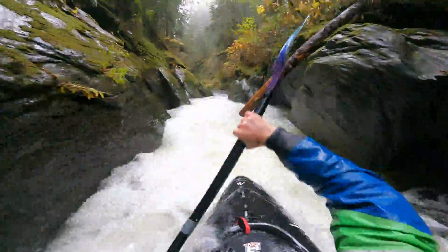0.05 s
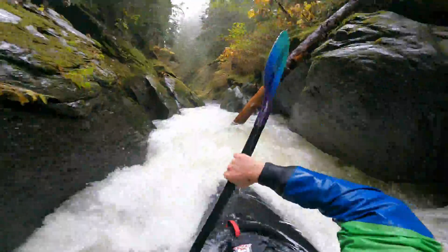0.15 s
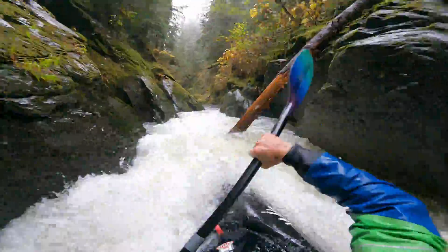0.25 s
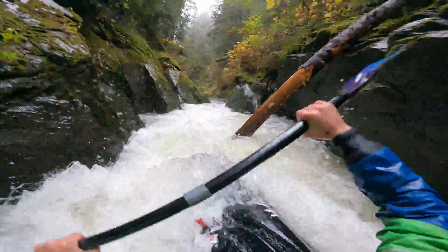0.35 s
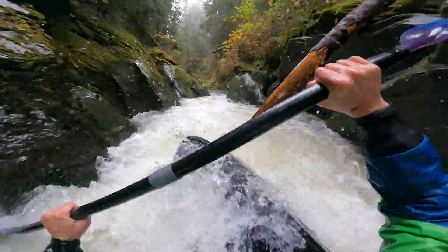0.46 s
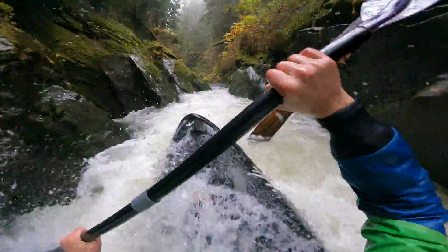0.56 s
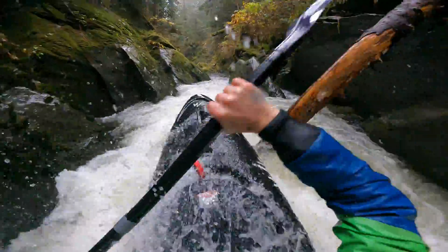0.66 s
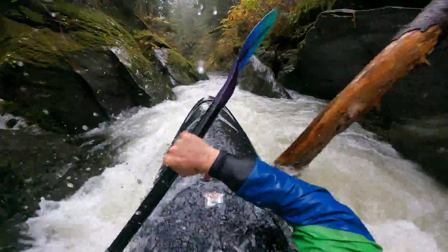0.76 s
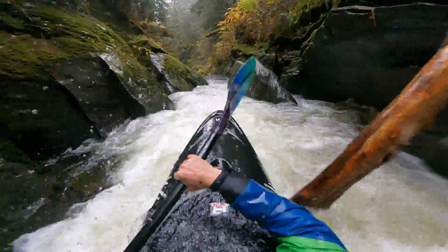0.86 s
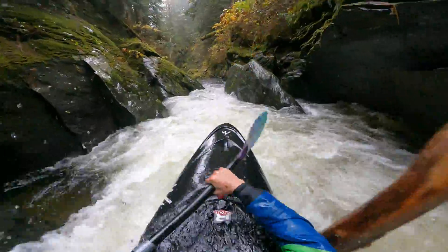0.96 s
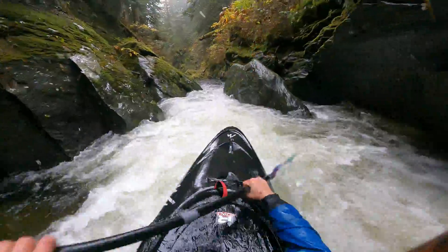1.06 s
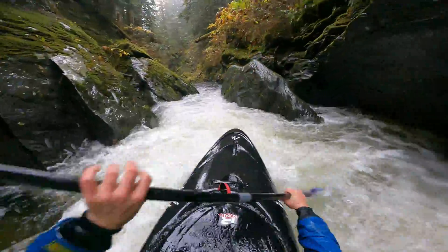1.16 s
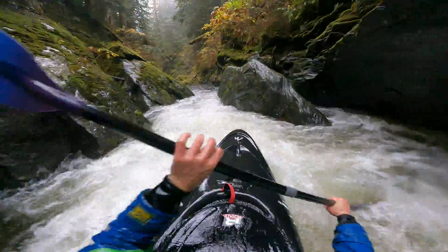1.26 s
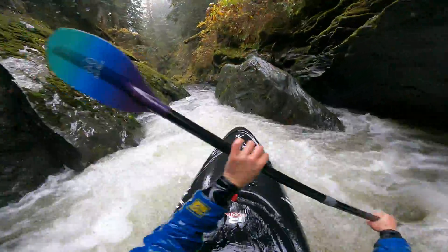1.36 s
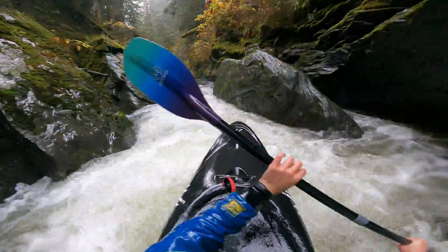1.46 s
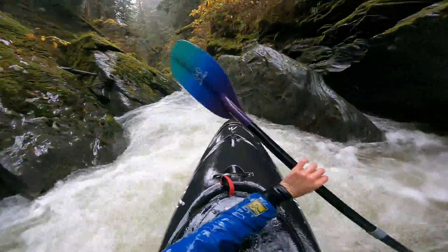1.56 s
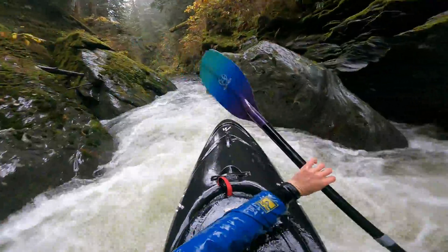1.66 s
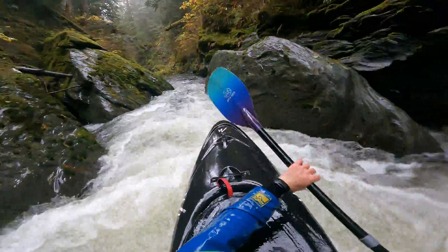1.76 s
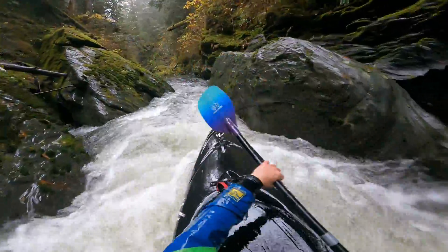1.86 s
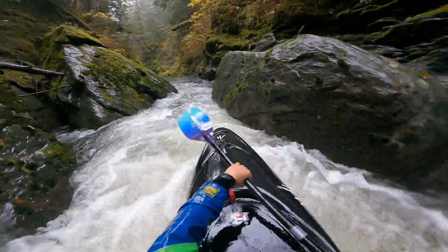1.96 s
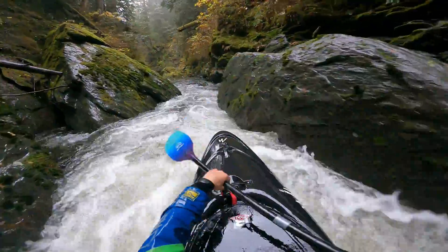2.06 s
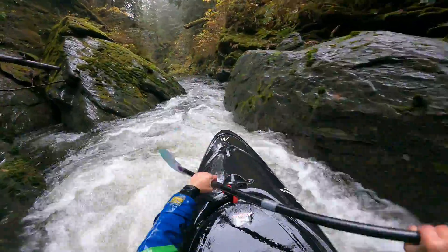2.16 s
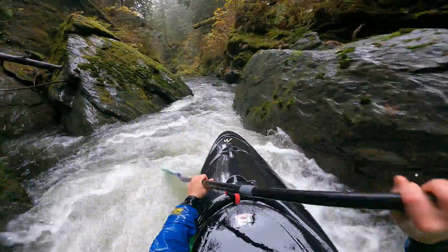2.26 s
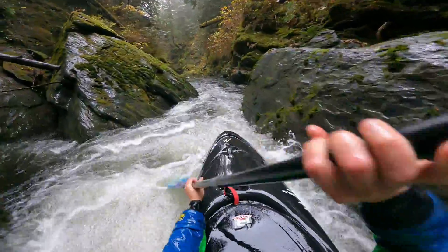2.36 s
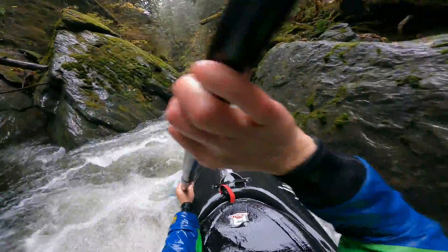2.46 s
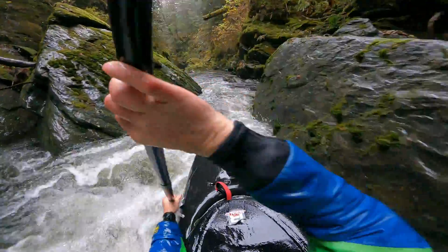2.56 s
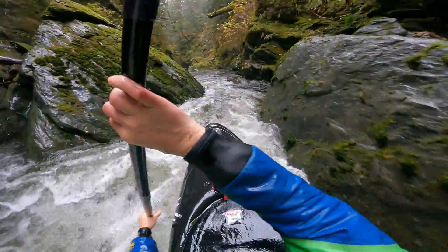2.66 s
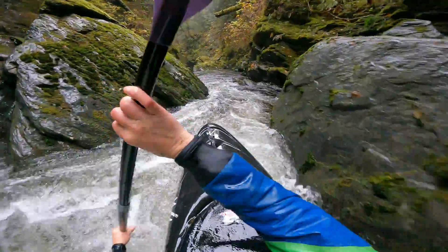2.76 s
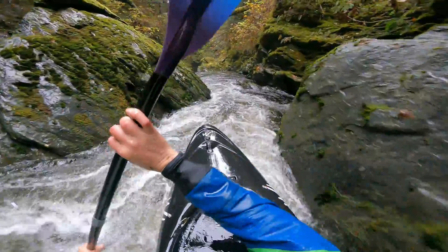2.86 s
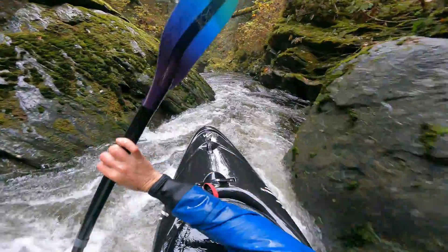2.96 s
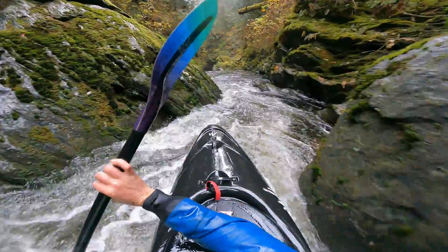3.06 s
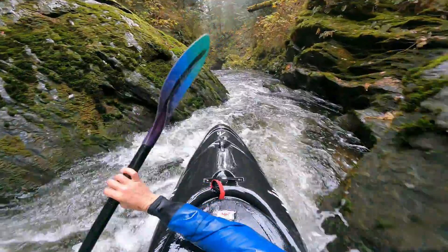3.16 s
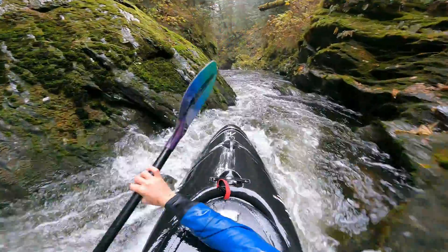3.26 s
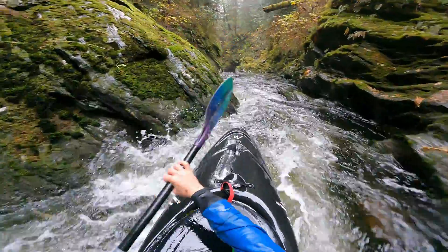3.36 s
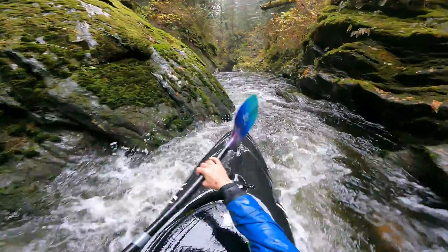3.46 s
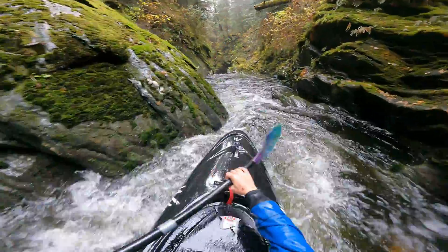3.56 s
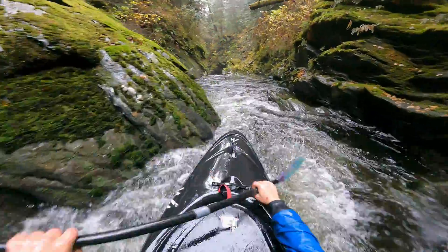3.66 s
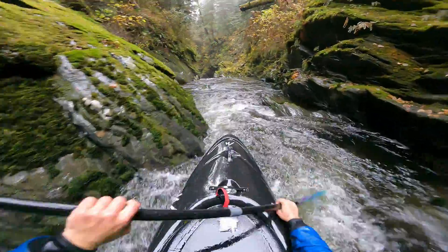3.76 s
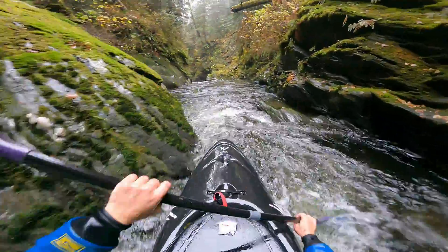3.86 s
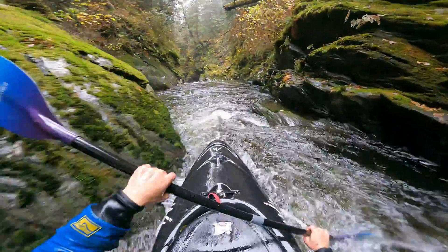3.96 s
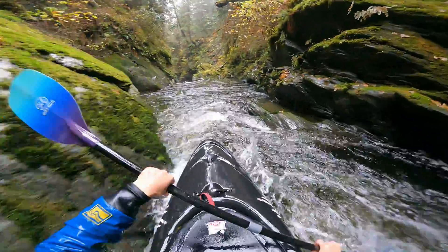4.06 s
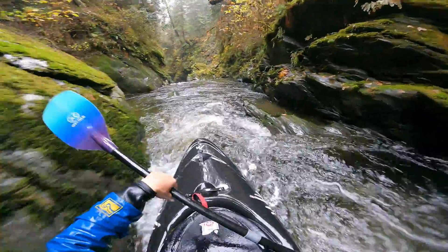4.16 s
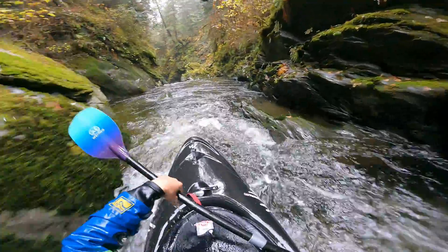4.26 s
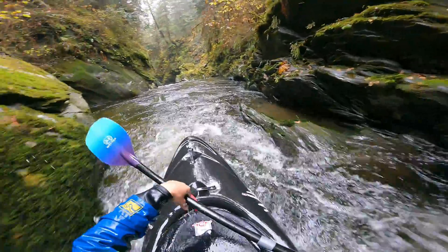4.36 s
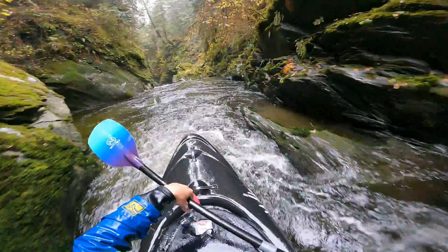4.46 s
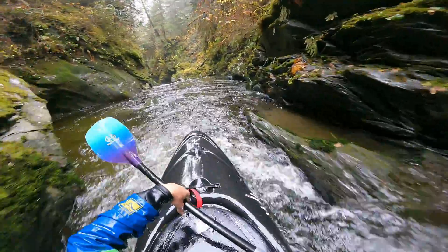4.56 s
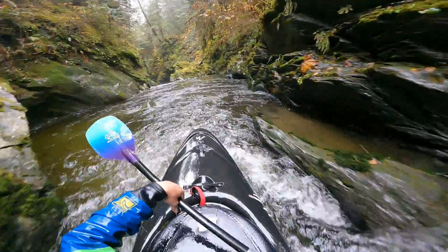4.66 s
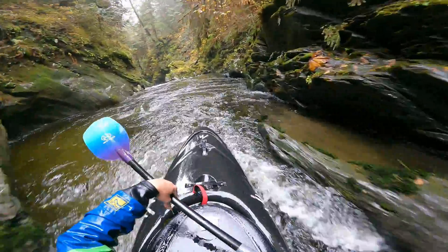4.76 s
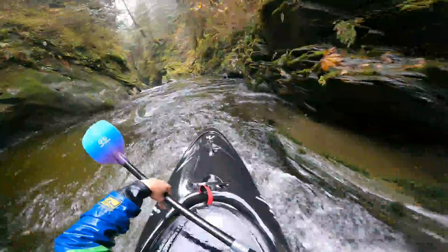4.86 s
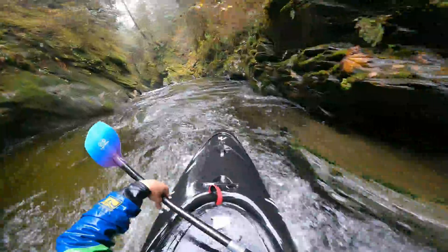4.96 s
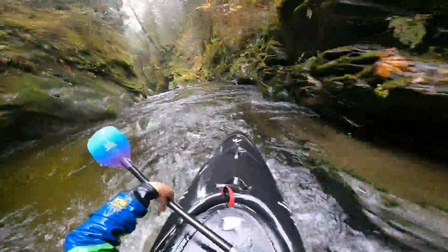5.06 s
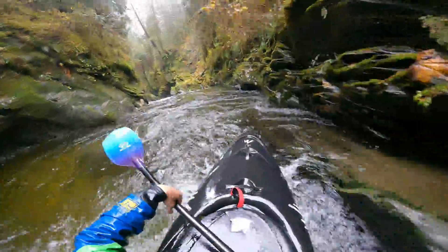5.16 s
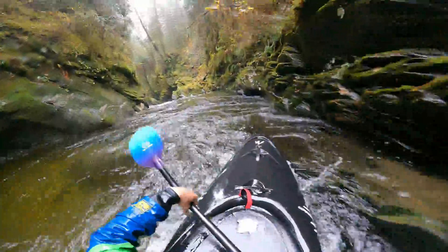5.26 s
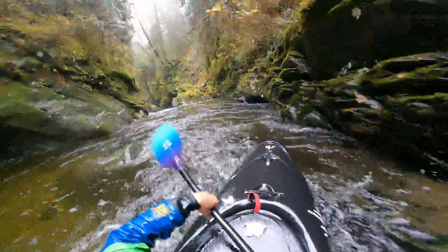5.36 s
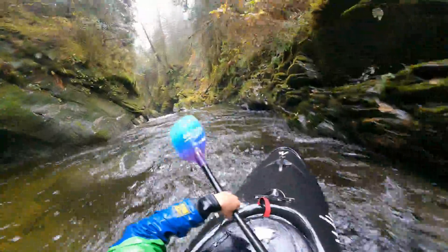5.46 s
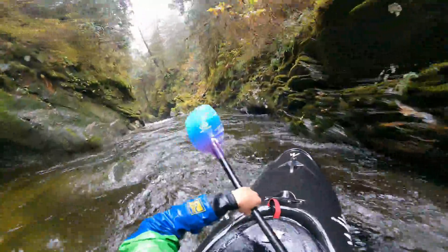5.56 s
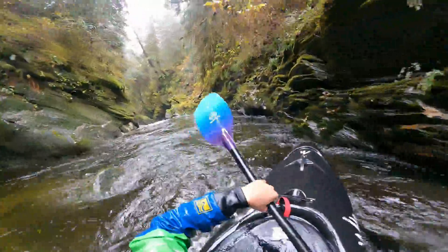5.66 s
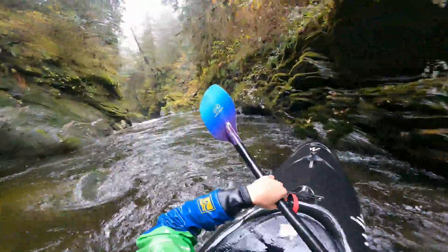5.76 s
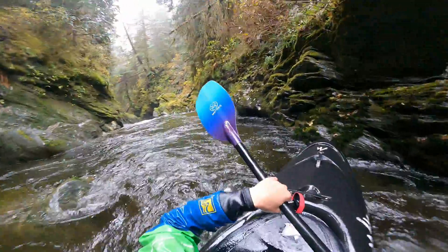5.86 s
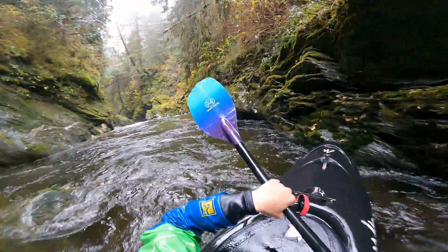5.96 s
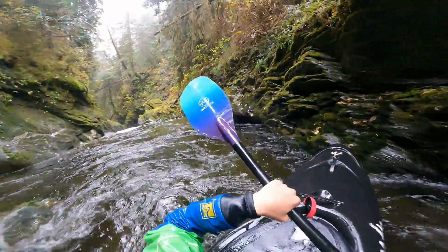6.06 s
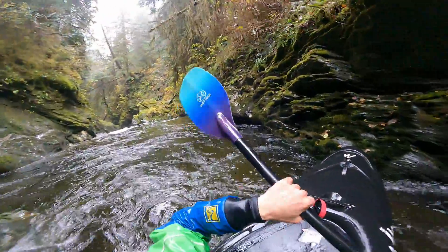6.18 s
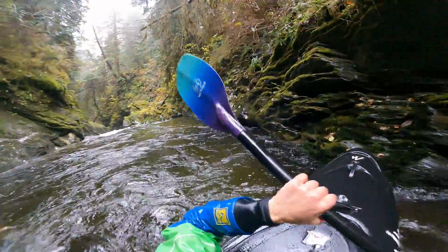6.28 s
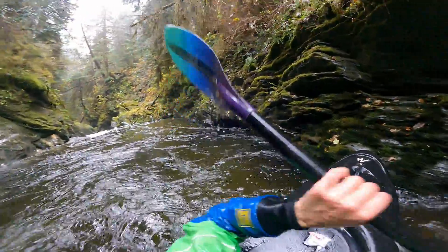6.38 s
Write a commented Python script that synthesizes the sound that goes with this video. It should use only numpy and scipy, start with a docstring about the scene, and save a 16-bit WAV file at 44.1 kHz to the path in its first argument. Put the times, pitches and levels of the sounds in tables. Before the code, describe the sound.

A kayak runs a rapid with a dull, waterlogged roar and hull slaps, giving way to thin watery hiss and plinking drops.

```python
"""A muffled roar with thumps and slaps on a hull: a kayak runs a steep creek rapid, heard by a small
helmet microphone whose port is drowned. Bursting bubbles make the roar; waves jolt and strike the boat.
As it glides into calmer water the port drains, drops ring, and the water hisses through the port's
resonances, which rise in pitch whenever the film of water thins."""
import sys
import numpy as np
from scipy import signal
from scipy.fft import rfft, irfft, next_fast_len
from scipy.io import wavfile
from scipy.ndimage import map_coordinates

SR = 44100
rng = np.random.default_rng(int(sys.argv[2]) if len(sys.argv) > 2 else 0)


def generate_wav(signal):
    """Clip the signal to [-1, 1] and save it as 16-bit WAV at the path in sys.argv[1]."""
    frames = np.transpose(np.atleast_2d(signal))
    scaled = np.clip(frames, -1, 1) * 32767
    pcm = np.round(scaled).astype(np.int16)
    wavfile.write(sys.argv[1], SR, pcm)


N = 283122


def amp(db):
    """Decibels to gain."""
    return 10 ** (np.asarray(db) / 20)


def rms_one(x):
    """Scale to unit rms."""
    return x / np.sqrt(np.mean(x ** 2) + 1e-20)


def curves(rows):
    """One automation curve for each column after the time, one value a sample."""
    times, *columns = np.transpose(rows)
    return [np.interp(np.arange(N) / SR, times, column) for column in columns]


def swells(rows):
    """Summed bell-shaped swells from rows of t/s, height, half-width/s."""
    t = np.arange(N) / SR
    return sum(height * np.exp(-((t - at) / width) ** 2) for at, height, width in rows)


def with_swells(bed, peaks):
    """Gain of a level curve with swells on top, both given in dB."""
    return amp(curves(bed)[0]) + swells([(at, amp(db), width) for at, db, width in peaks])


def drift(rate_hz, size=N):
    """Slow random wander of unit rms: coarse noise through a double one-pole low-pass."""
    step, settle = 20, 2000
    pole = np.exp(-2 * np.pi * rate_hz * step / SR)
    coarse = rng.standard_normal(size // step + settle + 2)
    slow = signal.lfilter([1], [1, -2 * pole, pole * pole], coarse)[settle:]
    return np.interp(np.arange(size) / step, np.arange(len(slow)), rms_one(slow))


def eq_curve(points):
    """Frequency response through points of f/Hz, level/dB."""
    hz, db = np.transpose(points)
    return lambda f: amp(np.interp(np.log(f), np.log(hz), db))


def froth(response, lumpy_db, rate_hz, size=N):
    """Bursting bubbles merge into lumpy noise, coloured by a frequency response."""
    padded = next_fast_len(size)
    bursts = rng.standard_normal(size) * amp(lumpy_db * drift(rate_hz, size))
    hz = np.maximum(np.arange(padded // 2 + 1) * SR / padded, 1)
    return rms_one(irfft(rfft(bursts, padded) * response(hz), padded)[:size])


def bent_froth(response, rise, lumpy_db, rate_hz):
    """Froth read at varying speed, so its resonances scale by the factor rise."""
    source = froth(response, lumpy_db, rate_hz, size=N * 4 // 3)
    return map_coordinates(source, np.cumsum(rise)[None], order=3)


def hits(rows, spread, attack_s, cycles, loose):
    """Clusters of rings around a pitch, falling 60 dB in so many cycles; loose (0-1) scatters phase."""
    count = 16
    out = np.zeros(N + SR)
    t = np.arange(SR // 4) / SR
    for (at, db, hz), (detune, phase) in zip(rows, rng.uniform(-1, 1, (len(rows), 2, count, 1))):
        ratio = np.exp(spread * detune)
        rings = np.sin(2 * np.pi * hz * ratio * t + np.pi * loose * phase) / ratio ** 2
        cluster = rings.sum(0) / count ** (1 - loose / 2)
        attack = 1 - np.exp(-(t / attack_s) ** 2)
        decay = amp(db - 60 * t * hz / cycles)
        out[round(at * SR):][:len(t)] += decay * cluster * attack
    return out[:N]


RUMBLE_EQ = [(7.1, -21), (12, 15.5), (34, 12), (75, 2), (98, -20), (160, -120)]  # sub-bass of the waves: f/Hz, level/dB
RUMBLE_BED = [(0, -22.5), (.15, -24), (.42, -23.5), (.68, -31.5), (1.0, -27), (2.0, -35), (2.4, -36.5),
              (2.62, -32), (3.0, -30.5), (3.2, -33), (4.2, -36.5), (6.42, -33.5)]  # its steady bed: t/s, level/dB
BOAT_JOLTS = [(0.276, -28.5, 0.11), (0.551, -23, 0.086), (0.902, -16.5, 0.056), (1.19, -17.5, 0.06),
              (1.382, -34.5, 0.071), (1.95, -29.5, 0.038), (2.753, -31.5, 0.15), (5.197, -34.5, 0.088),
              (6.123, -26.5, 0.068)]  # swells on top: t/s, level/dB, half-width/s


def wave_rumble():
    """Waves rumble under the boat and swell as they jolt it."""
    gain = with_swells(RUMBLE_BED, BOAT_JOLTS)
    return gain * froth(eq_curve(RUMBLE_EQ), lumpy_db=-5.0, rate_hz=5.0)


FLOW_LEVELS = [(0, -20.5, -22.5), (.75, -20.5, -23), (1.3, -24.5, -25.5), (1.9, -25, -24), (2.4, -27, -28),
               (2.6, -27.5, -29.5), (2.9, -26, -25.5), (3.5, -26, -26), (4.1, -26, -31),
               (4.6, -28.5, -29.5), (4.97, -26.5, -31), (5.03, -27.5, -25.5), (5.2, -26.5, -30),
               (5.31, -24, -29), (5.42, -29.5, -30.5), (5.7, -25.5, -29.5), (6.42, -28.5, -27.5)]  # water around the boat: t/s, roar level/dB, boom level/dB
BOOM_EQ = [(41, -10.5), (70, 0.5), (119, -5), (157, -0.5), (230, -5.5), (300, -22.5), (510, -120)]  # low body of the hull: f/Hz, level/dB
ROAR_EQ = [(130, -34), (220, -0.5), (356, -1), (405, -1.5), (722, -3.5), (793, -3.5), (826, -17.5),
           (880, -11), (1140, -43), (1940, -120)]  # low mids of the rapid: f/Hz, level/dB
LEAK_EQ = [(470, -51.5), (800, 3), (1020, -2), (1780, -22.5), (2690, -33.5), (4410, -46), (5200, -52.5),
           (6500, -56.5), (7600, -72), (9700, -120)]  # dull wash above the roar: f/Hz, level/dB
LEAK_FADE = [(0, -29.5), (.5, -28), (.68, -27.5), (.9, -30.5), (1.19, -31.5), (1.25, -32), (2.55, -35.5),
             (2.63, -34.5), (2.76, -35), (3.7, -40.5), (4.2, -72)]  # fade of that wash: t/s, level/dB


def whitewater():
    """The hull booms, the rapid roars and a dull wash leaks through the drowned port."""
    roar_db, boom_db = curves(FLOW_LEVELS)
    boom = amp(boom_db) * froth(eq_curve(BOOM_EQ), lumpy_db=1.36, rate_hz=3.6)
    roar = amp(roar_db) * froth(eq_curve(ROAR_EQ), lumpy_db=1.0, rate_hz=47.0)
    leak = amp(curves(LEAK_FADE)[0]) * froth(eq_curve(LEAK_EQ), lumpy_db=1.2, rate_hz=18.0)
    return boom + roar + leak


SPRAY_EQ = [(3500, -35), (5000, 8), (6500, 10.5), (8500, 11.5), (10500, -3), (12500, -12.5), (13800, -38.5),
            (14500, -32)]  # sizzle of droplets: f/Hz, level/dB
MIST_BED = [(5.3, -110), (5.6, -75), (5.97, -74), (6.15, -56), (6.42, -63)]  # steady spray through the thinning film: t/s, level/dB
SPRAY_BURSTS = [(0.06, -65, 0.026), (0.226, -73, 0.071), (0.422, -78, 0.073), (5.694, -70, 0.021),
                (6.109, -50, 0.019), (6.254, -53, 0.025), (6.335, -67, 0.023)]  # short spits: t/s, level/dB, half-width/s


def spray():
    """Faint bright spray: a few spits at the start, then a sizzle with short spits near the end."""
    gain = with_swells(MIST_BED, SPRAY_BURSTS)
    return gain * froth(eq_curve(SPRAY_EQ), lumpy_db=2.0, rate_hz=48.0)


SPLASH_CUES = [(.553, -36, 2000), (.592, -32.5, 2090), (.641, -32, 2020), (.652, -37, 2500),
               (.731, -35.5, 2890), (1.184, -28, 1246), (1.187, -40, 2500), (2.591, -31, 1570),
               (2.597, -46, 3220), (2.599, -29, 1690), (2.605, -36, 1580), (2.606, -44, 3300),
               (3.5, -41, 3000), (4.05, -31, 3735), (5.844, -23, 3655), (6.244, -21, 3550)]  # water on the helmet: t/s, level/dB, f/Hz


def helmet_splashes():
    """Water hits the helmet in short, noisy splats."""
    return hits(SPLASH_CUES, spread=0.24, attack_s=0.00056, cycles=56, loose=0.99)


DROP_CUES = [(.731, -46, 4800), (2.512, -43, 3800), (3.688, -33, 3460), (3.93, -29, 3070),
             (4.06, -34, 4080), (4.45, -29, 3400), (4.63, -30, 3096), (4.929, -11.5, 1550),
             (6.244, -14.5, 2350), (6.366, -15, 1920), (6.375, -14.5, 1374)]  # plinks: t/s, level/dB, f/Hz


def drops():
    """Single drops ring briefly at one pitch."""
    return hits(DROP_CUES, spread=0.036, attack_s=0.0008, cycles=64, loose=0.1)


THUMP_CUES = [(1.182, -7.5, 88), (1.61, -17, 36), (1.75, -11.5, 138), (1.8, -15.5, 70), (1.875, -13.5, 112),
              (2.605, -14, 50.6), (2.70, -15, 41), (2.79, -15, 77.4), (2.745, -18, 45.6), (2.925, -9.5, 85),
              (2.93, -19, 31.1), (2.975, -19, 74.6), (6.09, -19.5, 26)]  # bass hits on the hull: t/s, level/dB, f/Hz


def hull_thumps():
    """Heavy waves thump the hull with a soft attack."""
    return hits(THUMP_CUES, spread=0.046, attack_s=0.015, cycles=18, loose=0.2)


SLAP_CUES = [(1.084, -8.5, 620), (1.183, -5.5, 750), (1.188, -6.5, 520), (2.593, -13.5, 596),
             (3.025, -23, 568), (3.141, -15, 560), (3.227, -16, 610), (3.272, -11.5, 596),
             (3.308, -22, 603), (3.338, -13.5, 520), (3.517, -10, 258), (4.268, -8.5, 366.7),
             (5.012, -12.5, 669), (5.29, -14, 600)]  # midrange knocks on the hull: t/s, level/dB, f/Hz


def hull_slaps():
    """Water slaps the hull, quick and dull."""
    return hits(SLAP_CUES, spread=0.12, attack_s=0.001, cycles=28, loose=0.1)


def behind_film(modes, steepness):
    """Response of parallel resonances, with the top damped by the water film."""
    film_hz = 6680  # low-pass corner at rest

    def response(f):
        power = sum(amp(2 * db) / (1 + ((f - hz ** 2 / f) / width) ** 2) ** steepness
                    for hz, width, db in modes)
        return np.sqrt(power / (1 + (f / film_hz) ** 22))
    return response


# the port between clearings: t/s, nominal f/Hz, first resonance level/dB, upper ones against it/dB
PORT_DRAIN = [(2.3, 1708, -89.5, -9.5), (2.84, 1680, -54, -6.5), (2.9, 1647, -47.5, -16),
              (2.96, 1660, -47.5, -11.5), (3.0, 1690, -47, -10), (3.08, 1770, -49, -0.5),
              (3.18, 1724, -41.5, -8), (3.35, 1662, -39.5, -11), (3.48, 1648, -36, -14.5),
              (3.56, 1720, -40, -4), (3.66, 1610, -32, -11.5), (3.82, 1633, -32, -13),
              (3.95, 1706, -35, -7.5), (4.07, 1670, -33.5, -7), (4.2, 1684, -32, -6.5),
              (4.35, 1691, -32, -8), (4.5, 1655, -29.5, -12.5), (4.7, 1630, -32.5, -8.5),
              (4.9, 1613, -29, -13), (5.05, 1613, -28, -14), (5.19, 1635, -29, -12),
              (5.32, 1703, -25.5, -13.5), (5.42, 1669, -30.5, -8.5), (5.6, 1731, -28.5, -5.5),
              (5.76, 1717, -29.5, -3.5), (5.92, 1744, -26.5, -7.5), (6.05, 1846, -33, -1),
              (6.2, 1857, -30.5, -5), (6.33, 1855, -30.5, 0.5), (6.42, 1880, -28, -2)]
UPPER_GLIDE = [(2.9, 2750), (3.12, 2875), (3.28, 2740), (3.8, 2740), (4.13, 2774), (4.6, 2718),
               (5.18, 2688), (5.3, 2800), (5.45, 2717), (5.67, 2843), (5.94, 2881), (6.05, 3054),
               (6.42, 3168)]  # strongest upper resonance between clearings: t/s, f/Hz
CAVITY_FADE = [(2.2, -68), (3.55, -54.5), (3.62, -49.5), (4.1, -38), (4.93, -36.5), (5.02, -32.5),
               (6.42, -29)]  # air in the housing as the port opens: t/s, level/dB
FILM_CLEARINGS = [(5.71, 105.1, 0.046), (6.115, 374.5, 0.033), (6.25, 334, .035)]  # the film clears briefly: t/s, nominal lift/Hz, half-width/s
FIRST_PEAKS = [(1370, 340, -6), (1639, 173, 7)]  # first resonance at rest: f/Hz, width/Hz, level/dB
UPPER_PEAKS = [(2283, 170, -3), (2737, 300, 4), (2950, 600, -6), (3380, 540, -11), (3860, 720, -15),
               (5060, 480, -21.5), (5920, 670, -25)]  # upper resonances at rest: f/Hz, width/Hz, level/dB
CAVITY_PEAKS = [(1065, 530, -4.5), (1230, 260, -1.5)]  # housing cavity at rest: f/Hz, width/Hz, level/dB
OPEN_EQ = [(600, -30), (850, -2), (1850, 0.5), (2800, -9), (4500, -19.5), (7000, -45), (9500, -110)]  # broad wash through the open port: f/Hz, level/dB


def draining_port():
    """Water hisses through the port; the thinning film lifts every resonance, the cavity the least."""
    rest_hz, upper_rest_hz = 1650, 2747
    port_db_per_khz, cavity_db_per_khz, wash_db_per_khz = -14, -5, 38
    nominal_hz, drain_db, upper_db = curves(PORT_DRAIN)
    lift_hz = swells(FILM_CLEARINGS)
    pitch_hz = nominal_hz + lift_hz

    # a clearing ducks the resonances and brings up the broad wash
    port_db = drain_db + port_db_per_khz * lift_hz / 1000
    cavity_db = curves(CAVITY_FADE)[0] + cavity_db_per_khz * lift_hz / 1000
    wash_db = port_db - port_db.max() - 49 + wash_db_per_khz * (pitch_hz - rest_hz) / 1000

    wobble = 1 + 0.005 * drift(rate_hz=9.0)
    rise = pitch_hz * wobble / rest_hz
    upper_rise = (curves(UPPER_GLIDE)[0] + 2.15 * lift_hz) * wobble / upper_rest_hz
    first = bent_froth(behind_film(FIRST_PEAKS, 1.636), rise ** 1.4, lumpy_db=2.0, rate_hz=56.0)
    upper = bent_froth(behind_film(UPPER_PEAKS, 2.27), upper_rise, lumpy_db=1.7, rate_hz=14.0)
    cavity = bent_froth(behind_film(CAVITY_PEAKS, 2.9), rise ** 0.45, lumpy_db=1.8, rate_hz=20.0)
    wash = froth(eq_curve(OPEN_EQ), lumpy_db=0.5, rate_hz=30.0)
    return amp(port_db) * (first + amp(upper_db) * upper) + amp(cavity_db) * cavity + amp(wash_db) * wash


WIDTH_EQ = [(30, -48.5), (500, -73.5), (1200, -61.5), (2500, -61), (4000, -35.5), (9000, -17)]  # stereo side against the middle: f/Hz, level/dB


def scene():
    """A nearly mono mix; a faint, delayed copy widens the treble."""
    mid = wave_rumble() + whitewater() + draining_port() + spray()
    mid += helmet_splashes() + drops() + hull_slaps() + hull_thumps()
    delay = SR // 50  # 20 ms
    late = np.concatenate([mid[:delay][::-1], mid[:-delay]])
    hz = np.arange(N // 2 + 1) * SR / N + 1
    side = irfft(rfft(late) * eq_curve(WIDTH_EQ)(hz), N)
    return np.array([mid + side, mid - side])


def record(dry):
    """A steep low-pass cuts the top."""
    stop_hz = 14600
    return signal.sosfilt(signal.cheby2(24, 70, stop_hz, fs=SR, output="sos"), dry)


dry = scene()
out = record(dry)
generate_wav(out)
```